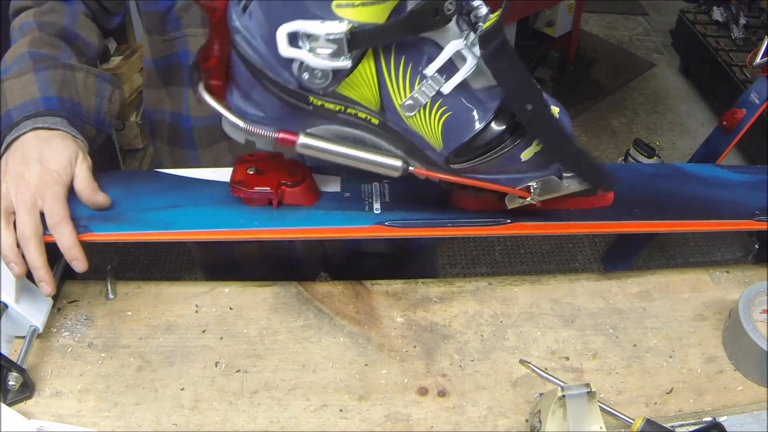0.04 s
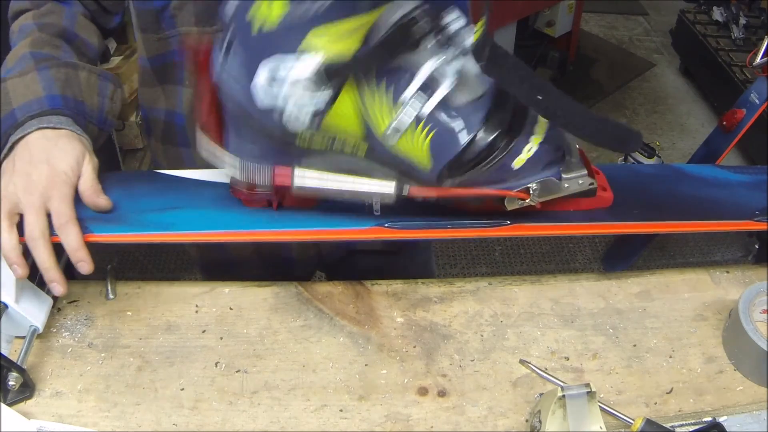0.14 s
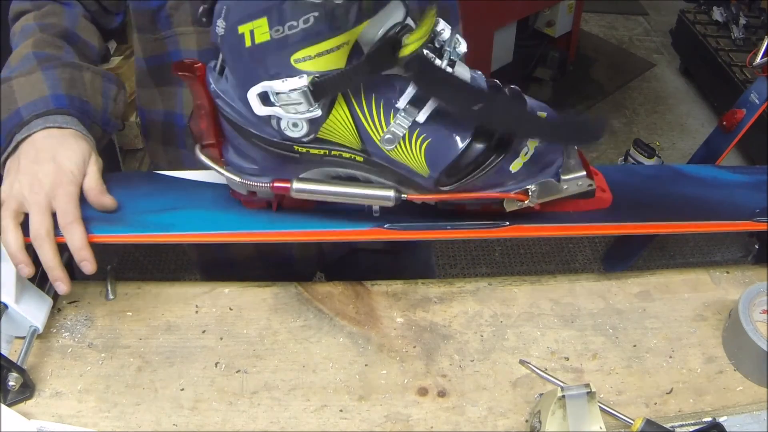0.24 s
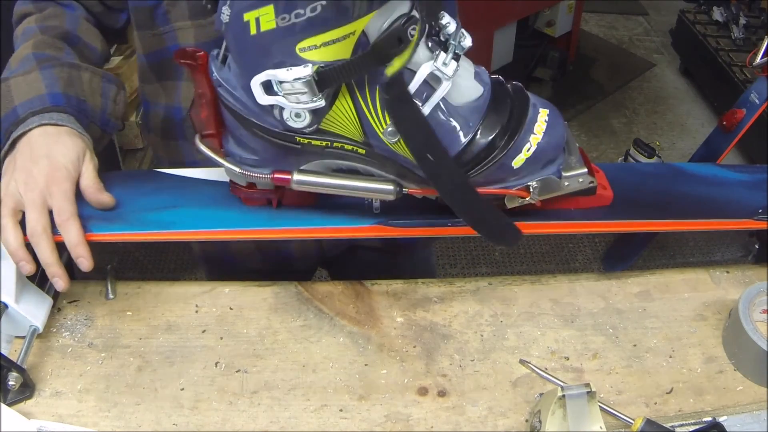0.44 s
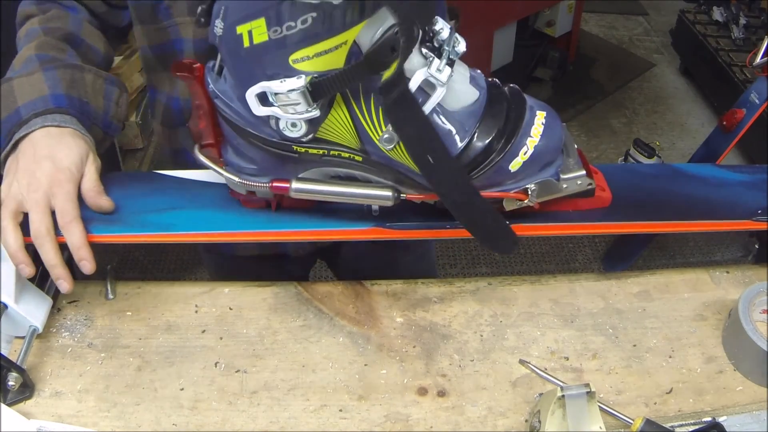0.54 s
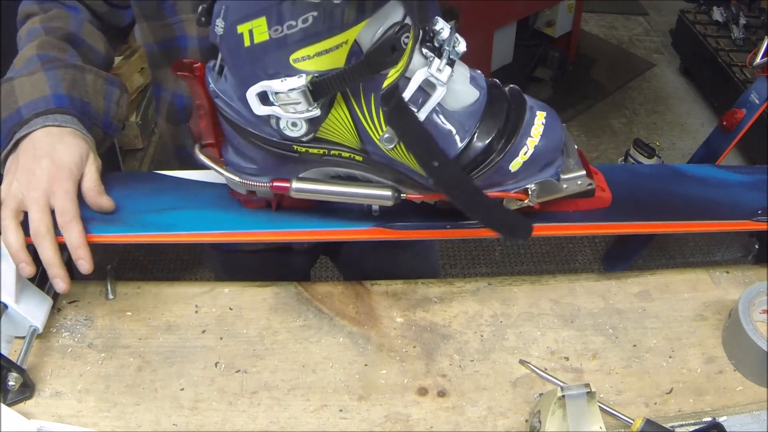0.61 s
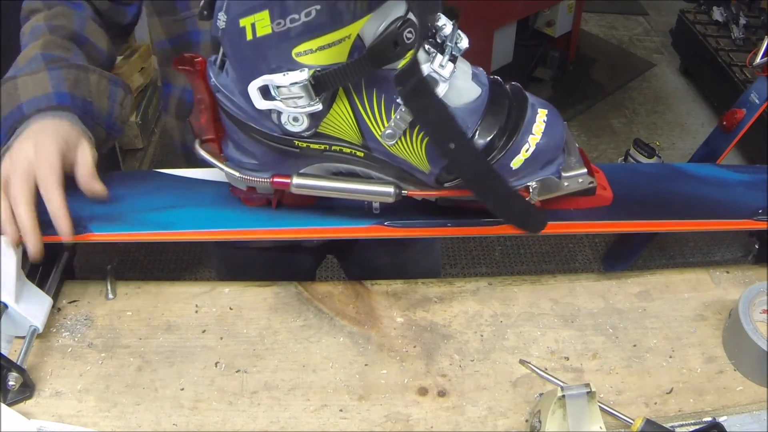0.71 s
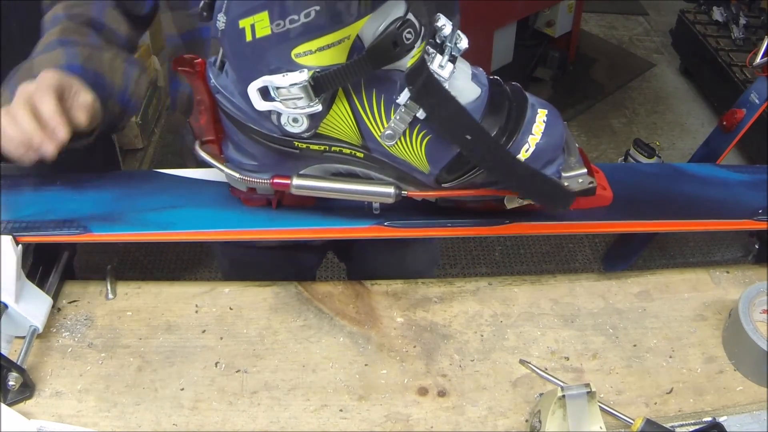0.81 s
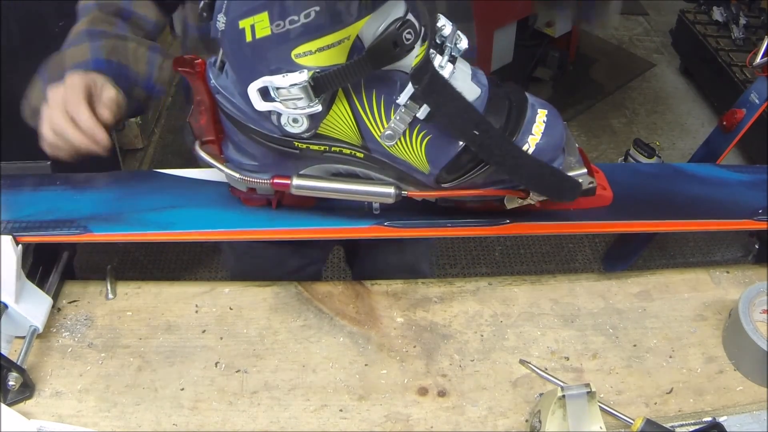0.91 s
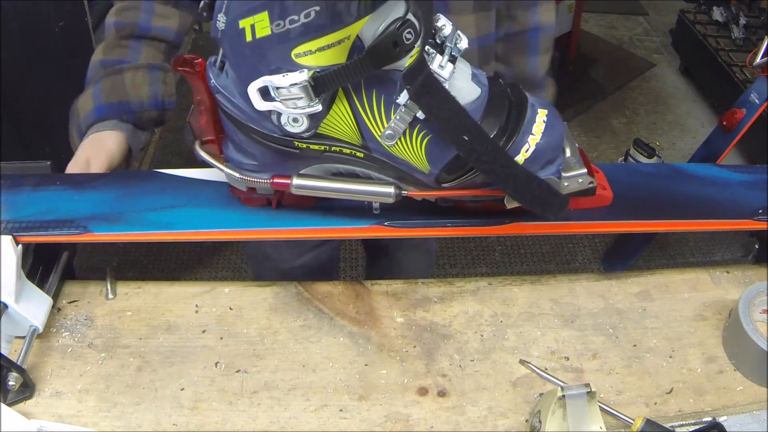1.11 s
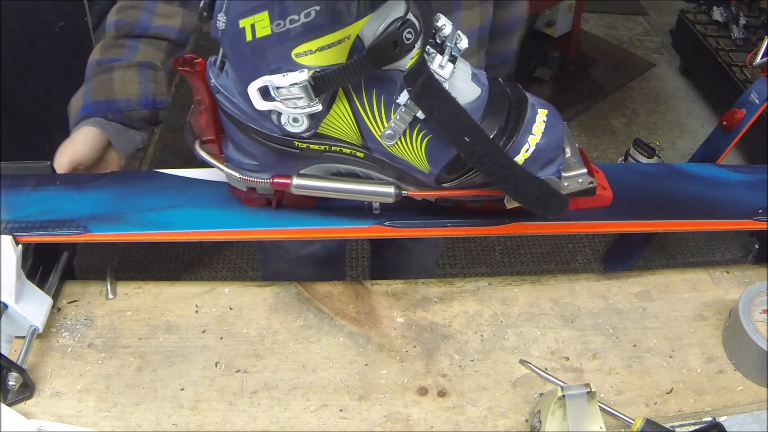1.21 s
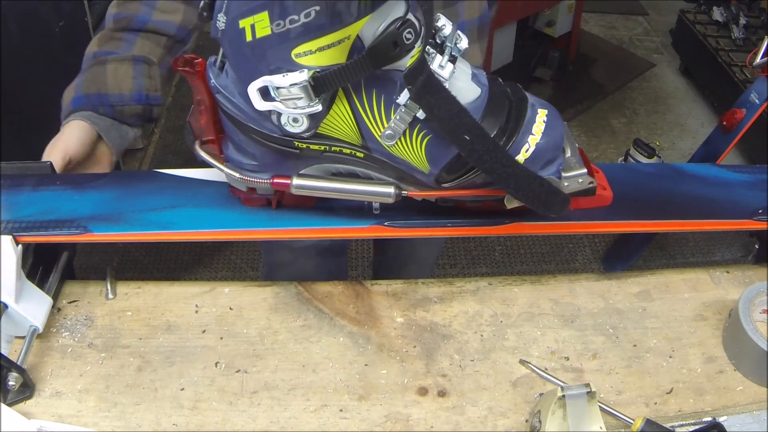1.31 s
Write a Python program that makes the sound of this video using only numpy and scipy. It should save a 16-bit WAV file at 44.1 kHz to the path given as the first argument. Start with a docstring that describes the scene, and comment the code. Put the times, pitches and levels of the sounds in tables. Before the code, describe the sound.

A ski boot heel drops onto a binding: a light tick, then a quick hard plastic clatter with a low thud, faint buckle rattle and fading rumble, heard close in a quiet, slightly hissy workshop.

```python
"""A hard plastic ski boot, held at the toe, drops its heel onto the binding of a ski clamped on a workbench.
Throughout, a quiet workshop: low rumble and microphone hiss, made as coloured noise; steadied low noise shudders.
First a light tick, then the chattering knock: humped pushes and random clicks ring the shell, noise cracks on top.
From the knock on, soft pushes thud in the low modes of ski and bench; a faint bounce touches near 0.56 s.
Loose buckles rattle faintly before the knock and more strongly after it: random clicks drive the shell modes."""
import sys
import numpy as np
from scipy import signal
from scipy.fft import rfft, irfft, next_fast_len
from scipy.io import wavfile
from scipy.ndimage import uniform_filter1d

SR = 44100
rng = np.random.default_rng(int(sys.argv[2]) if len(sys.argv) > 2 else 0)


def unload_audio(sound):
    """Save the sound as a 16-bit wav file, at the path given as the first command line argument."""
    columns = np.transpose(np.atleast_2d(sound))
    # keep every value between -1 and 1, then stretch to whole-number steps
    steps = np.round(np.clip(columns, -1, 1) * 32767)
    wavfile.write(sys.argv[1], SR, steps.astype(np.int16))


N = 59535

# modes of boot shell and binding: f/Hz, relative level/dB, t60/s
SHELL = [(538, -23, 0.015), (725.5, -23.5, 0.019), (980, -19.5, 0.021), (1279, -1, 0.023),
         (1330, -1.5, 0.029), (1415, -5, 0.028), (1585, 4.5, 0.013), (1885, -15.5, 0.028),
         (2330, -15.5, 0.031), (2667, -14.5, 0.019), (2766, -20.5, 0.027), (2986, -15.5, 0.025),
         (3323, -16, 0.021), (3580, -35, 0.059), (4160, -20, 0.02), (5090, -17, 0.017)]
METAL_FROM_HZ, TREBLE_HZ, LEAN_HZ = 4000, 2100, 1480  # band edges among the shell modes


def amp(db):
    """Amplitude ratio of a level in dB."""
    return 10 ** (np.asarray(db) / 20)


def rms_one(x):
    """Scale to rms 1."""
    return x / np.sqrt(np.mean(x ** 2) + 1e-20)


def ring(clicks, hz, t60_s):
    """Two-pole resonator: a unit click starts a decaying sine of initial height 1."""
    r = amp(-60 / (t60_s * SR))
    w = 2 * np.pi * hz / SR
    return signal.lfilter([0, np.sin(w)], [1, -2 * r * np.cos(w), r * r], clicks + 1e-18)


def coloured(spectrum):
    """Gaussian noise of rms 1, shaped by a (f/Hz, relative density/dB) table, -80 dB outside it."""
    hz, db = np.transpose(spectrum)
    grid_hz = np.maximum(np.arange(N // 2 + 1) * SR / N, 1)
    shape_db = np.interp(np.log(grid_hz), np.log(hz), db, left=-80, right=-80)
    return rms_one(irfft(rfft(rng.standard_normal(N)) * amp(shape_db), N))


def steadied(noise):
    """Divide out most of the chance swells of a noise; rms 1."""
    swell_s, swell_left = .03, .3  # smoothing time, share of the swells kept
    power = uniform_filter1d(noise ** 2, int(swell_s * SR))
    power = uniform_filter1d(power, int(swell_s * SR / 2))
    return rms_one(noise / (power + .01) ** ((1 - swell_left) / 2))


def sine_hump(t, start_s, length_s):
    """Half-sine force of one contact, zero outside it."""
    return np.sin(np.pi * np.clip((t - start_s) / length_s, 0, 1))


def workshop_floor():
    """Steady low rumble and microphone hiss as one coloured noise."""
    # f/Hz, relative density/dB
    spectrum = [(160, 1), (280, -1.5), (385, -2), (463, -4.5), (616, -7), (669, -7.5), (740, -7.5),
                (1070, -11), (1290, -7.5), (1600, -13.5), (3240, -14), (3640, -17.5), (6760, -25),
                (9950, -25), (15400, -35)]
    level_db = -68.5
    return amp(level_db) * coloured(spectrum)


def room(x):
    """Reverberation by eight parallel feedback delays, duller on every round."""
    t60_s, wall_cut_hz = 0.2, 7500
    size = next_fast_len(N + SR)
    z = np.exp(-2j * np.pi * np.arange(size // 2 + 1) / size)  # delay of one sample
    dull = np.exp(-2 * np.pi * wall_cut_hz / SR)
    lags = (rng.uniform(.012, .04, 8) * SR).astype(int)
    gain = 0
    for k, lag in enumerate(lags):
        loop = amp(-60 * lag / SR / t60_s) * z ** lag * (1 - dull) / (1 - dull * z)
        gain = gain + (-1) ** k * loop / (1 - loop)
    return irfft(rfft(x, size) * gain, size)[:N]


def shudder():
    """Uneven low rumble of the ski rocking in its clamps: two noise bands under level curves."""
    # level curves, interpolated across both stretches: t/s, deep level/dB, upper level/dB
    curves = [
        [(0, -65.5, -72), (.022, -45, -54), (.052, -57, -59), (.074, -52, -63.5), (.102, -64.5, -60.5),
         (.14, -56, -72), (.176, -63, -55), (.19, -59, -64.5)],
        [(.21, -63, -46), (.228, -38.5, -40), (.255, -51, -37.5), (.298, -46, -40.5), (.358, -46, -48),
         (.41, -50, -55), (.466, -46, -56), (.548, -48, -67), (.58, -53.5, -50.5), (.61, -48, -57.5),
         (.638, -49, -65), (.67, -56.5, -54.5), (.7, -50, -54), (.76, -52, -59), (.85, -55, -60.5),
         (.936, -53.5, -66), (1.034, -56.5, -59), (1.064, -51.5, -57), (1.162, -50, -68), (1.26, -56.5, -69),
         (1.3, -62, -60.5), (1.35, -56.5, -63.5)],
    ]
    # deep band: f/Hz, relative density/dB
    deep_spectrum = [(12, -36), (20, -9), (75, 0.5), (96, -2), (130, -19), (170, -31.5), (290, -120)]
    # upper band: f/Hz, relative density/dB
    upper_spectrum = [(59, -31.5), (100, -4.5), (130, -9), (177, -6.5), (215, -17.5), (268, -22),
                      (330, -29.5), (430, -41.5), (730, -120)]
    curve_s, deep_db, upper_db = np.transpose(np.vstack(curves))
    t = np.arange(N) / SR
    deep = amp(np.interp(t, curve_s, deep_db)) * steadied(coloured(deep_spectrum))
    upper = amp(np.interp(t, curve_s, upper_db)) * steadied(coloured(upper_spectrum))
    return deep + upper


def thuds():
    """Weight lands on the ski, which knocks on in its clamps: soft pushes ring ski and bench modes."""
    # pushes: t/s, push level/dB, extra push on the upper modes/dB, length/s
    pushes = [(0.206, -55.5, 14.5, 0.0034), (0.2247, -44, 10, 0.0027), (0.228, -30.5, -3.5, .004),
              (0.248, -43, 6.5, 0.00467), (0.267, -46, 4, 0.0036), (.290, -30.5, -2.5, 0.0024),
              (0.365, -39, 5, 0.008), (0.447, -37.5, -9.5, 0.0036), (0.514, -43.5, -4.5, 0.004),
              (0.576, -47, 3, 0.0049), (0.625, -40, -3, 0.0065), (0.703, -44.5, 6.5, 0.0061),
              (0.809, -43, -9, 0.0052), (0.922, -46, -4, 0.0095), (1.051, -54.5, 10.5, 0.0059),
              (1.08, -56.5, 10, 0.0062)]
    # modes of ski and bench: f/Hz, relative level/dB, t60/s
    modes = [(45.6, -10, 0.053), (58.4, 2, 0.19), (90.3, -5, 0.12), (104, -6.5, 0.082), (169.5, -2, 0.15),
             (217, -2.5, 0.054), (262, -5, 0.12)]
    upper_from_hz, band_hz = 90, [19, 310]
    t = np.arange(N) / SR
    push = np.zeros((2, N))  # rows: low modes, upper modes
    for start_s, db, upper_db, length_s in pushes:
        hump = sine_hump(t, start_s, length_s) ** 2
        push += amp([[db], [db + upper_db]]) * hump / hump.sum()
    rings = sum(amp(db) * ring(push[int(hz > upper_from_hz)], hz, t60_s) for hz, db, t60_s in modes)
    return signal.sosfilt(signal.butter(2, band_hz, "band", fs=SR, output="sos"), rings)


def buckle_rattle(sizes, draw, signs, hz):
    """Loose buckles, faint before the knock and stronger after it: random clicks drive the shell modes."""
    # level curve, interpolated across the gap between its two stretches,
    # silent before the first and after the last point: t/s, level before trim_db/dB
    curve = [
        [(.03, -99), (.06, -74), (.12, -75), (.165, -91)],
        [(.3, -60.5), (.34, -70.5), (.39, -67), (.43, -80), (.48, -76.5), (.51, -73), (.55, -79), (.6, -68),
         (.65, -80.5), (.71, -71.5), (.77, -74), (.86, -95), (.9, -95)],
    ]
    trim_db, clicks_per_s = -16, 4000
    treble_db, lean_db, metal_db = 4, 3.5, -15  # metal_db adds to treble_db
    curve_s, curve_db = np.transpose(np.vstack(curve))
    level_db = trim_db + np.interp(np.arange(N) / SR, curve_s, curve_db, left=-120, right=-120)
    clicks = amp(level_db) * sizes * (draw < clicks_per_s / SR)
    colour_db = np.where(hz > TREBLE_HZ, treble_db, np.where(hz > LEAN_HZ, lean_db, 0))
    colour_db = colour_db + metal_db * (hz > METAL_FROM_HZ)
    return signs * clicks * amp(colour_db)


def touch_colour_db(hz, treble_db, crack_db, lean_db, middle_db):
    """Drive of each shell mode in one touch; the highest rings follow crack and treble alike."""
    body_from_hz, middle_from_hz = 1130, 1300
    treble = np.where(hz > METAL_FROM_HZ, (crack_db + treble_db) / 2, treble_db)
    beside_main = (hz > LEAN_HZ) | (hz < body_from_hz)
    lower = np.where(beside_main, lean_db, middle_db * (hz > middle_from_hz))
    return np.where(hz > TREBLE_HZ, treble, lower)


def dry_crack(puff):
    """Crack of each touch: coloured noise under a rapidly dying envelope."""
    # f/Hz, relative density/dB
    spectrum = [(300, -18), (520, -5), (1060, -25.5), (1800, -9), (2060, -10), (3010, -9.5), (4450, -19.5),
                (5170, -19), (15000, -45)]
    trim_db, t60_s = -6.5, 0.026
    dying = signal.lfilter([1], [1, -amp(-60 / (t60_s * SR))], puff)
    return amp(trim_db) * dying * coloured(spectrum)


def shell_rings(drive):
    """A yielding contact feeds each mode only near its own pitch; the mode then rings."""
    contact_t60_s = .008
    unity = 2 * (1 - amp(-60 / (contact_t60_s * SR)))  # contact gain near 1 at the mode's pitch
    rings = 0
    for row, (hz, db, t60_s) in zip(drive, SHELL):
        contact = unity * ring(row, hz, contact_t60_s)
        rings = rings + amp(db) * ring(contact, hz, t60_s)
    return rings


def knocks():
    """Heel and buckles touch: each touch pushes and chatters the shell modes, with a dry crack on top."""
    # t/s, level/dB, treble/dB, crack/dB, lean to the rings around the main ones/dB, middle rings/dB, length/s
    touches = [(.002, -55.5, 9, -9.5, -21, -3, 0.0035), (0.014, -57.5, -11, -6, 3.5, -1, 0.0029),
               (0.113, -74, -8, -10, 15, -6, 0.01), (0.17, -49, -4, 3, -9, -5, 0.0033),
               (0.173, -44, 1, -1.5, -15, -6, 0.0044), (0.177, -44, -1, -10, -11, -13, 0.0056),
               (0.182, -53, 1, -7, -3, -17, 0.0064), (0.204, -53, 2, 13, -20, -11, 0.0031),
               (.206, -40.5, -3, 3, -10, 5.5, 0.0052), (0.2103, -40, 9, 0.5, -5, -8, 0.008),
               (0.215, -36.5, -0.5, -6, 4.5, 2, 0.0072), (0.2187, -37.5, -16, -8, 5, 9, 0.0062),
               (0.224, -45.5, 13, -25, 6, -1, 0.004), (.238, -49.5, 7, 6, 10.5, -3, 0.0096),
               (0.248, -60, -5, 5.5, 12, -13, .008), (0.261, -38.5, -21, -10.5, 2, -23, 0.0039),
               (0.267, -34, -4, -17, -4, -3, .004), (0.268, -33.5, -18, -36, -2, 3, 0.0073),
               (.273, -34, -6, -29, -14.5, 1, 0.0028), (0.281, -45, -16, -8, 7, -6, 0.0044),
               (0.291, -58, -7, -15, 3, 2, 0.011), (0.301, -66, -5, 6, 0, -11, .004),
               (0.303, -74, -3, -14, -7, -16, .005), (.562, -66, 16, 12.5, 3, -5, 0.002),
               (.567, -63, 4, -9, -1, -2, 0.0017)]
    chatter_per_s, chatter_spread_db = 8300, 3
    rough, evenness = .35, 0.05  # chatter share of a touch; floor of the evening-out between modes
    t = np.arange(N) / SR
    hz = np.array(SHELL)[:, :1]
    sizes = amp(chatter_spread_db * rng.exponential(1, N))
    draw = rng.random(N)
    clicks = sizes * (draw < chatter_per_s / SR)
    signs = rng.choice([-1, 1], (len(SHELL), N))
    phase = 2 * np.pi * rng.random((len(SHELL), 1))
    drive = buckle_rattle(sizes, draw, signs, hz)
    puff = np.zeros(N)
    for start_s, db, treble_db, crack_db, lean_db, middle_db, length_s in touches:
        span = slice(int(start_s * SR), int((start_s + length_s) * SR) + 2)
        hump = sine_hump(t[span], start_s, length_s)
        unit_hump = hump / np.sum(hump)
        burst = signs[:, span] * clicks[span] * hump
        # power of the burst at each mode's pitch, to even out the modes
        felt = np.abs(np.sum(burst * np.exp(2j * np.pi * hz * t[span]), axis=1, keepdims=True)) ** 2
        chatter = burst / np.sqrt(felt + evenness * np.sum(burst[0] ** 2) + 1e-9)
        # push in step with each mode's swing
        in_step = 2 * unit_hump * np.cos(2 * np.pi * hz * t[span] + phase)
        level = amp(db + touch_colour_db(hz, treble_db, crack_db, lean_db, middle_db))
        drive[:, span] += level * (rough * chatter + (1 - rough) * in_step)
        puff[span] += amp(db + crack_db) * unit_hump
    return shell_rings(drive) + dry_crack(puff)


def scene():
    """Sum of all layers; only the knocks, rattle included, feed the room."""
    room_db = -20
    knock = knocks()
    ski = thuds() + shudder()
    return (workshop_floor() + ski + amp(room_db) * room(knock) + knock)[None]


def record(dry):
    """Steep elliptic low-pass cuts the top."""
    cutoff_hz = 15300
    return signal.sosfilt(signal.ellip(12, .5, 70, cutoff_hz, fs=SR, output="sos"), dry)


dry = scene()
out = record(dry)
unload_audio(out)
```